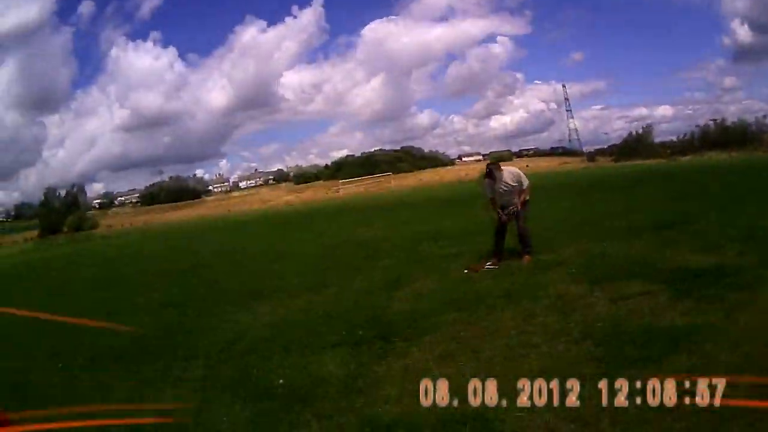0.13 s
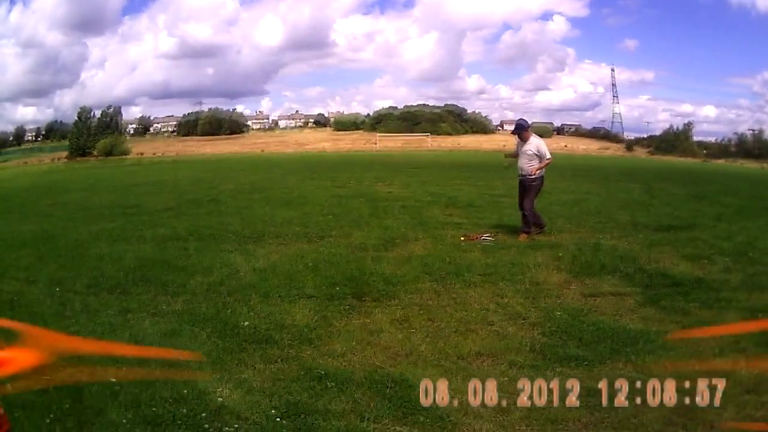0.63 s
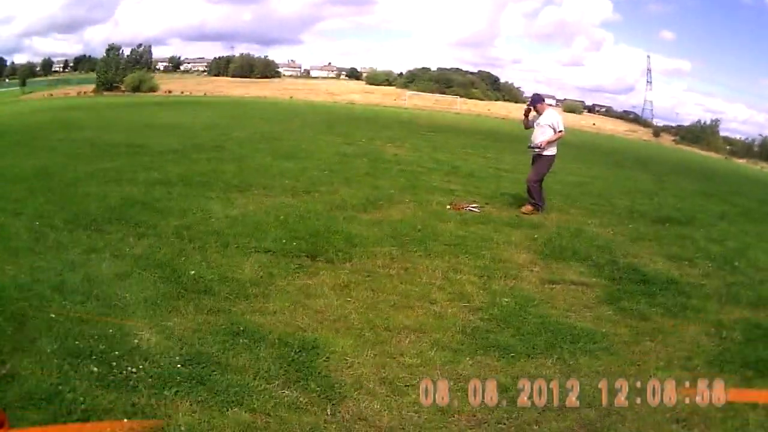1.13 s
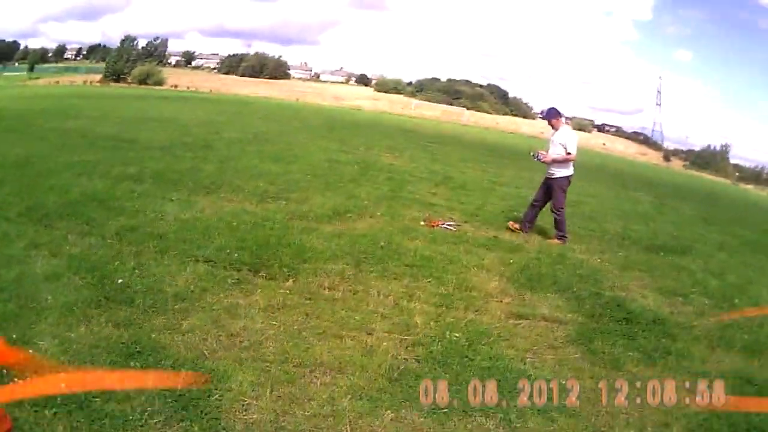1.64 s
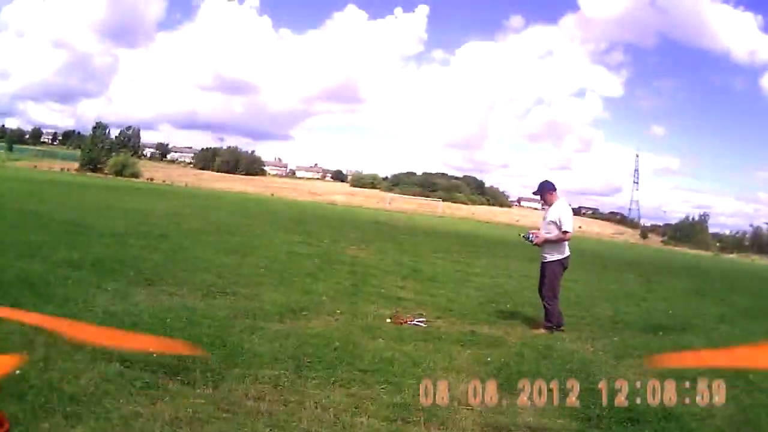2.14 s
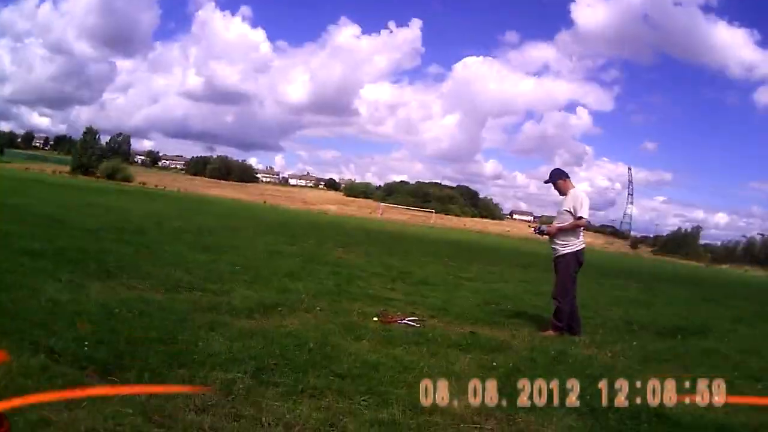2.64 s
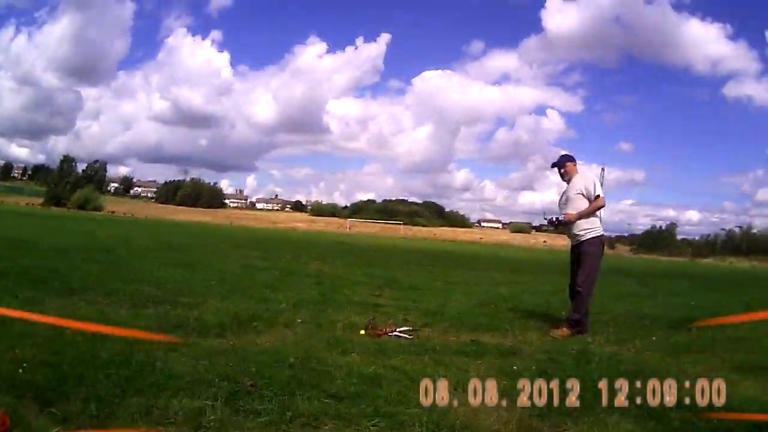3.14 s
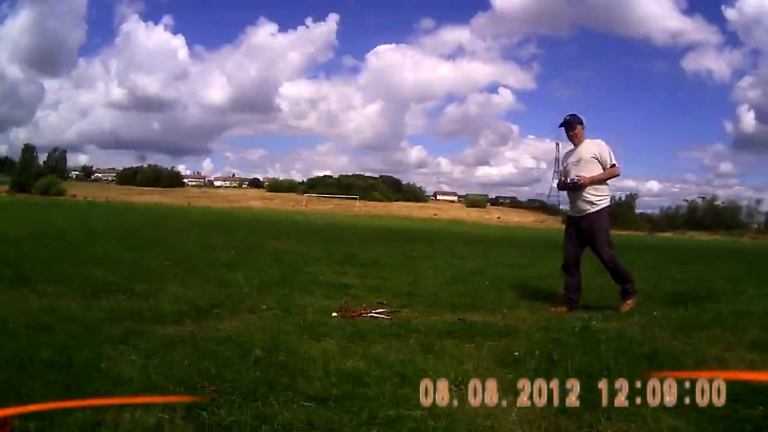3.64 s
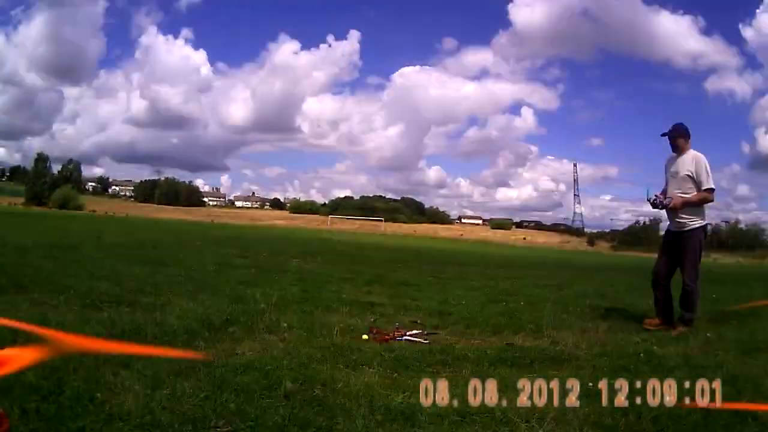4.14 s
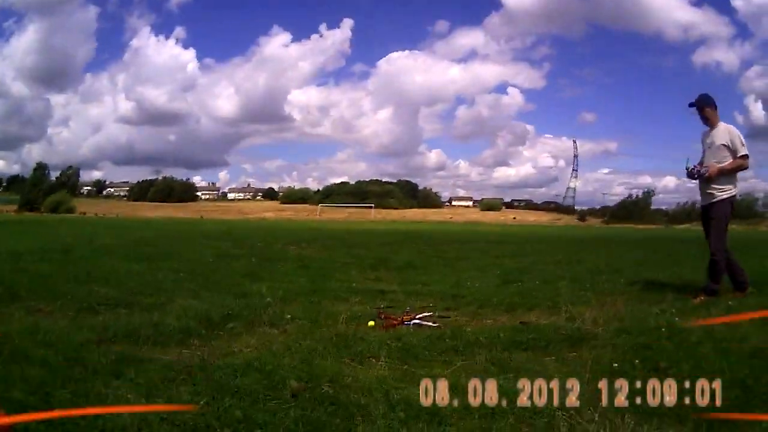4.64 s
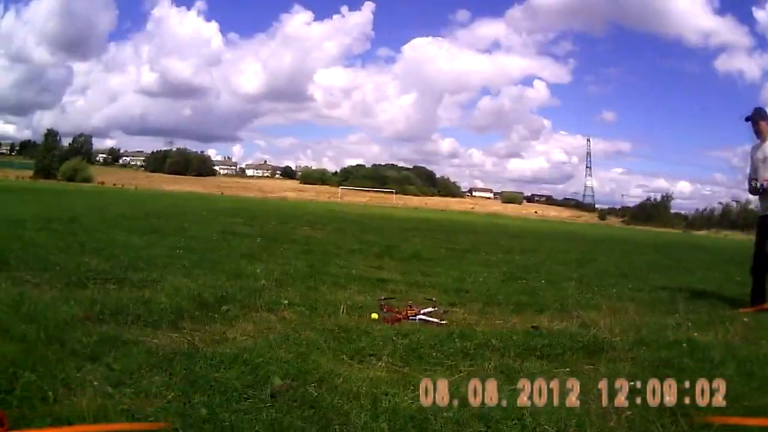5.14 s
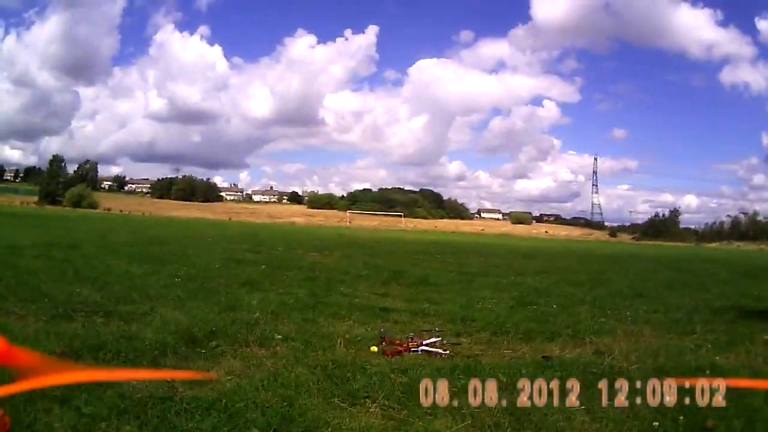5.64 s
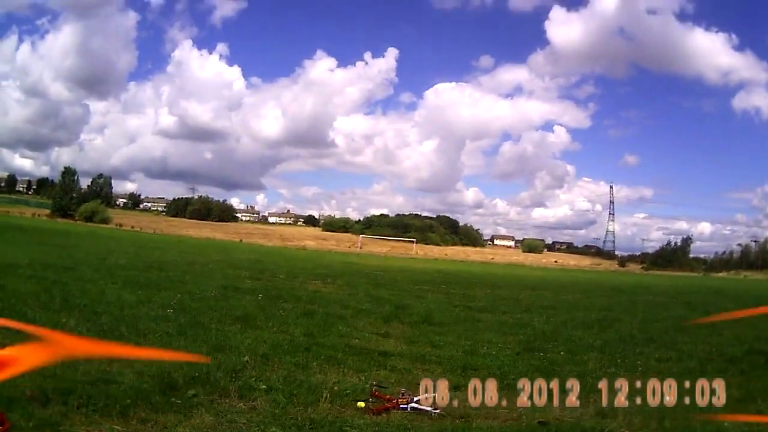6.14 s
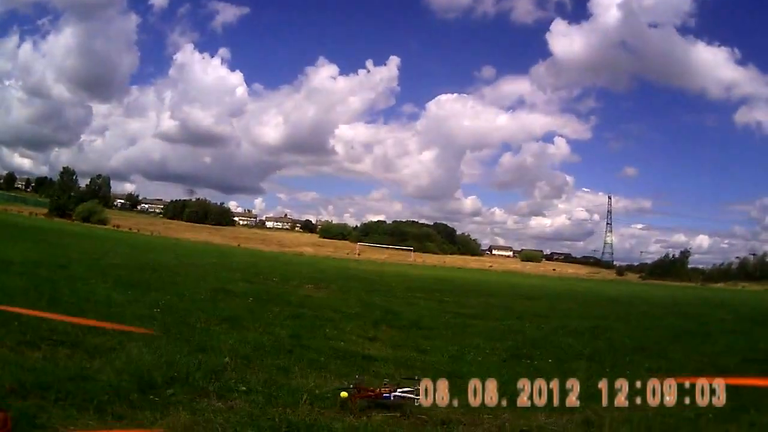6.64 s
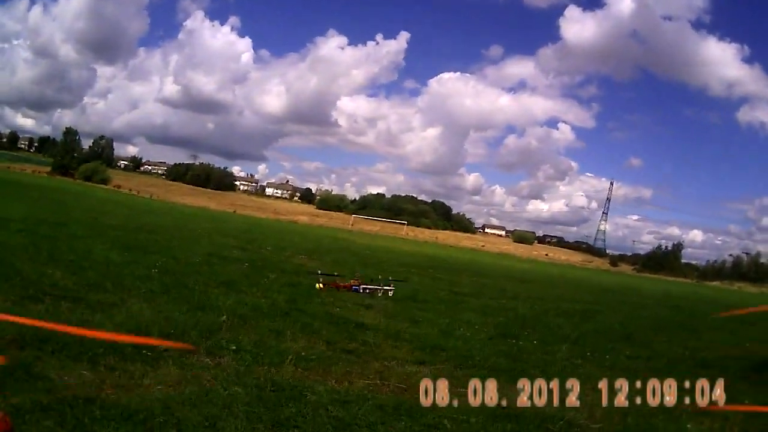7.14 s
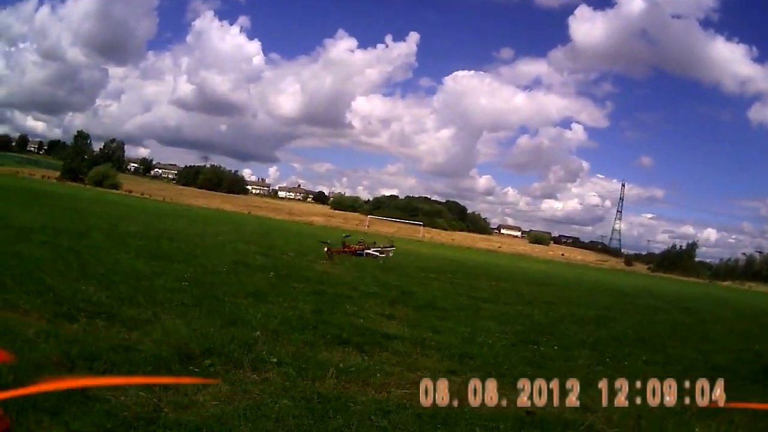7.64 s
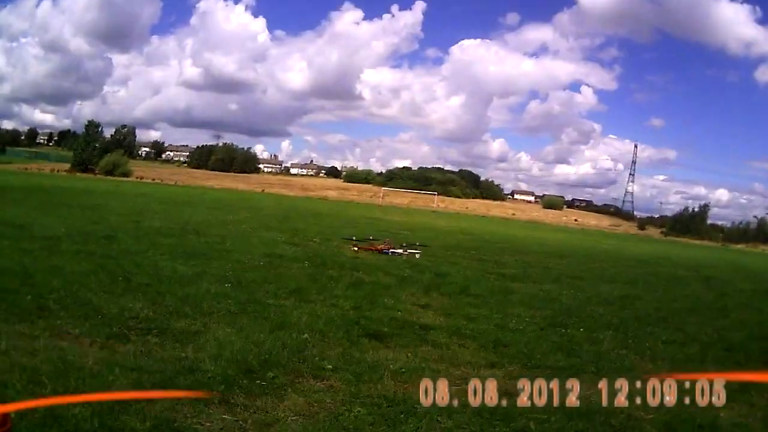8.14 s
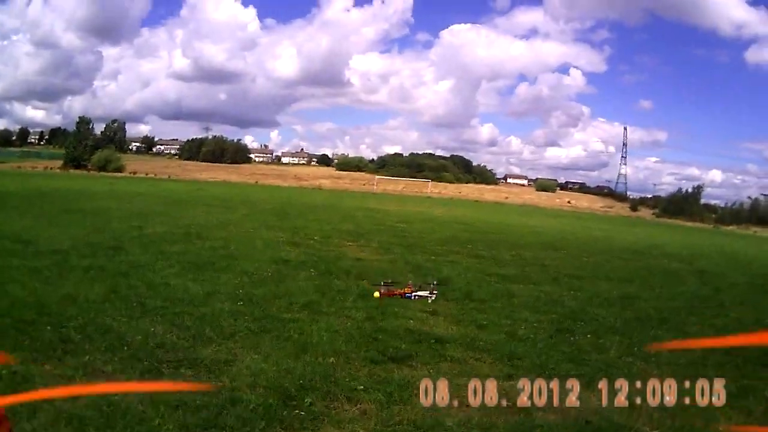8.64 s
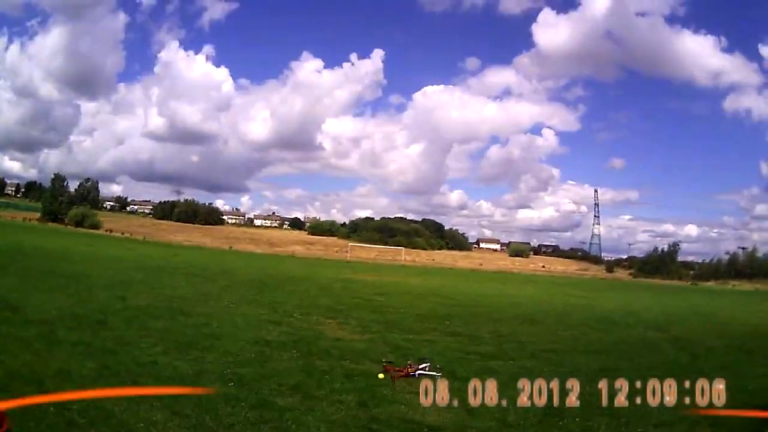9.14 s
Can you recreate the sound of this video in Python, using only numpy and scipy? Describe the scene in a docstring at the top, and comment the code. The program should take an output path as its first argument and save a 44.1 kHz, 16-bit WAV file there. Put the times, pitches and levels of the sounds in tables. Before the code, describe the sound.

Several small propellers drone and throb right against the microphone, with a plastic case buzzing and rattling harshly in short bursts, overloaded and dull.

```python
"""A small camera rides on a hovering four-rotor craft, between the propellers.
From the start the blades throb at slightly different speeds, their downwash buffets the microphone,
and the shaking makes the loose camera case knock on its mount. From about 0.4 s short fits of hard
rattling break in, again and again to the end. Around 2.1 s the far rotor slows under load and grows
louder. Throughout, the loudest moments overload the slow converter at the input."""
import sys
import numpy as np
from scipy import signal
from scipy.fft import rfft, irfft
from scipy.io import wavfile
from scipy.ndimage import map_coordinates

SR = 44100
rng = np.random.default_rng(int(sys.argv[2]) if len(sys.argv) > 2 else 0)


def decibels_to_gain(level_db):
    """Convert a level in decibels to a linear amplitude gain (20 dB per decade)."""
    exponent = np.asarray(level_db, float) / 20
    return 10 ** exponent


def int16_out(signal):
    """Quantize to a 16-bit WAV file."""
    q = np.round(np.clip(np.atleast_2d(signal).T, -1, 1) * 32767)
    wavfile.write(sys.argv[1], SR, q.astype(np.int16))


N = 408366   # length [samples]


def rms_one(x):
    """Scale to unit rms, the usual measure of strength."""
    return x / np.sqrt(np.mean(x ** 2) + 1e-20)


def in_time(rows):
    """Draw straight lines between the rows of a (time, value) table, one value a sample."""
    times, values = np.transpose(rows)
    return np.interp(np.arange(N) / SR, times, values)


def drift(rate_hz):
    """Slow chance wandering around 0 with spread 1: low-passed noise, made at every 40th sample."""
    r = np.exp(-2 * np.pi * rate_hz * 40 / SR)
    noise = rng.standard_normal(N // 40 + 2002)
    slow = signal.lfilter([1], [1, -2 * r, r * r], noise)[2000:]   # skip the filter's start-up
    return np.interp(np.arange(N) / 40, np.arange(len(slow)), rms_one(slow))


def filtered(x, order, hz, kind="low"):
    """Butterworth filter: keeps only part of the pitch range."""
    return signal.sosfilt(signal.butter(order, hz, kind, fs=SR, output="sos"), x)


def filtered_in_place(x, order, hz, kind="low"):
    """The same filter run forwards and backwards, so that nothing is delayed."""
    return signal.sosfiltfilt(signal.butter(order, hz, kind, fs=SR, output="sos"), x)


# tones of a two-blade rotor: (multiple of the blade rate [1], level [dB])
ROTOR_TONES = [(.5, -13), (1, 0), (1.5, -16), (2, -12.5)]


def rotor(hz, level_db, waver_hz, gust_db, overtone_db=0):
    """Blade tone with overtones and shaft tones; each swells on its own in the disturbed air."""
    turns = np.cumsum(hz + waver_hz * drift(6.0)) / SR
    phase = 2 * np.pi * (turns + rng.random())
    tones = 0
    for multiple, db in ROTOR_TONES:
        tone_db = db + overtone_db * (multiple == 2) + gust_db * drift(9.0)
        tones = tones + decibels_to_gain(tone_db) * np.cos(multiple * phase)
    return np.sqrt(2) * decibels_to_gain(level_db) * tones


# speed of the three rotors nearest the microphone, as the craft trims its hover:
# (time [s], blade passes [Hz])
FAST_ROTOR = [(0, 192.6), (.42, 193), (.7, 188.2), (1.12, 194.5), (1.54, 188), (1.82, 195.1), (2.1, 179.2),
              (2.24, 186.5), (2.42, 207), (2.52, 205.2), (2.72, 184), (2.94, 186.9), (3.2, 202.8),
              (3.4, 199.4), (3.8, 198.8), (4.34, 192.2), (4.55, 200.8), (4.76, 199.2), (4.95, 188),
              (5.18, 184.9), (5.58, 202.7), (5.85, 189.3), (6.16, 181.2), (6.55, 196.9), (6.93, 192),
              (7.56, 205.4), (7.84, 201), (8.26, 199.2), (8.82, 193.6), (9.1, 198.6), (9.26, 197.5)]
SLOW_ROTOR = [(0, 177), (.28, 177.7), (.42, 173.4), (.9, 171.4), (1.24, 174), (1.54, 165.8), (1.9, 170.1),
              (2.2, 178), (2.38, 178.6), (2.64, 168.1), (3.0, 177.9), (3.22, 177.1), (3.64, 162),
              (4.06, 172), (4.3, 171), (4.6, 178), (4.9, 164.9), (5.18, 165.1), (5.46, 183.8), (5.62, 175),
              (6.021, 162.1), (6.58, 178.3), (6.86, 164), (6.999, 164.3), (7.26, 175), (7.7, 162.5),
              (7.9, 168.3), (8.3, 173.1), (8.54, 168.8), (8.78, 171), (9.1, 166.6), (9.26, 170.5)]
THIRD_ROTOR = [(0, 184), (.25, 186.5), (.54, 179.5), (.72, 184), (1.08, 188.5), (1.44, 184), (1.8, 185.5),
               (1.98, 180.5), (2.339, 186.5), (2.52, 187), (2.85, 180), (3.06, 188.5), (3.6, 168.5),
               (3.78, 175.5), (3.96, 175.5), (4.14, 165.5), (4.32, 166), (4.68, 178), (4.86, 173),
               (5.22, 184.5), (5.58, 187.5), (5.8, 164), (6.052, 158), (6.548, 167), (6.9, 161), (7.1, 163),
               (7.38, 182.5), (7.74, 184), (8.1, 165.5), (8.3, 167), (8.821, 162.5), (9.0, 171.5),
               (9.26, 174)]
# blade hum of the near rotors, before their own swells: (time [s], level [dB])
HUM = [(0, -17), (.3, -13), (1.2, -16.5), (1.55, -12.5), (2.1, -16), (2.35, -12), (2.7, -14.5), (3.35, -11),
       (3.9, -14.5), (4.6, -12.5), (5.1, -14), (5.45, -11), (6.05, -16.5), (6.6, -13), (7.1, -15.5),
       (7.4, -13.5), (7.8, -15.5), (8.3, -12.5), (8.6, -15.5), (9.26, -14)]
# share of the (fast [dB], slow [dB], third [dB]) rotor in the hum
ROTOR_SHARES = (-4.5, -4.5, -6.5)
SWELL_DB, SWELL_HZ = 3, 5.0   # each near rotor also swells and fades on its own
FAR_SHARE, FAR_DB = .92, -26   # far rotor: speed as share of the fast and slow rotors' mean; level
# once the far rotor slows under load: middle of the bell-shaped sag, its spread, drop, rise
SAG_AT_S, SAG_SPREAD_S, SAG_HZ, SAG_DB = 2.12, .16, 15, 7
SAG_OVERTONE_DB = 13   # the loaded blades sound their overtone more strongly
SUM_TONES_DB = 3.5   # gain on the sum tones


def rotors():
    """Four rotors beating against each other; the one-sided mount adds their sum tones."""
    hum_db = in_time(HUM)
    fast, slow, third = (in_time(rows) for rows in (FAST_ROTOR, SLOW_ROTOR, THIRD_ROTOR))
    blades = 0
    for hz, share_db in zip((fast, slow, third), ROTOR_SHARES):
        level_db = hum_db + share_db + SWELL_DB * drift(SWELL_HZ)
        blades = blades + rotor(hz, level_db, waver_hz=1.4, gust_db=1.0)

    sag = np.exp(-.5 * ((np.arange(N) / SR - SAG_AT_S) / SAG_SPREAD_S) ** 2)
    wander_hz = 4.0 * (1 - sag) * drift(.8)
    far_hz = FAR_SHARE * (fast + slow) / 2 + wander_hz - SAG_HZ * sag
    blades = blades + rotor(far_hz, FAR_DB + SAG_DB * sag, waver_hz=1.5, gust_db=3.5,
                            overtone_db=SAG_OVERTONE_DB * sag)

    sum_tones = filtered(blades ** 2, 2, [250, 420], "band")   # squaring makes the sums
    return blades + decibels_to_gain(SUM_TONES_DB) * sum_tones


# short fits of hard rattling: (start time [s], length [s], rise aimed at [dB])
FITS = [(.439, .025, 6.5), (1.608, 0.02, 2.5), (1.644, 0.022, 3), (1.899, 0.018, 2.5), (2.286, .04, 8),
        (2.335, 0.045, 7), (2.647, 0.027, 8.5), (2.87, 0.022, 5.5), (3.044, 0.06, 3.5), (3.122, 0.049, 6.5),
        (3.237, 0.052, 5.5), (3.312, 0.11, 6.5), (3.499, .02, 7), (3.721, .065, 7), (4.285, .035, 5.7),
        (4.545, 0.027, 5.2), (5.323, .05, 5), (5.448, 0.041, 6), (5.504, 0.03, 5), (5.84, 0.025, 6.5),
        (6.603, 0.018, 7), (6.694, .03, 9), (7.18, 0.02, 9.5), (7.322, 0.05, 8.5), (7.554, .03, 8.5),
        (7.866, 0.051, 7.5), (8.145, .04, 7), (8.208, 0.028, 8), (8.267, 0.088, 8), (8.776, 0.022, 7),
        (9.008, 0.066, 7), (9.165, 0.067, 6)]
FIT_EDGE_S = 0.021   # a fit swells and dies over this time; the shortest turn back before the top


def fits():
    """Rise of the rattling in dB: each fit swells, holds if long enough, and dies."""
    s, rise_db = np.arange(N) / SR, np.zeros(N)
    for start, length, db in FITS:
        first, last = max(int((start - .05) * SR), 0), int((start + length + .05) * SR)
        span = slice(first, last)
        to_nearer_end = np.minimum(s[span] - start, start + length - s[span])
        rise_db[span] += db * np.clip(to_nearer_end / FIT_EDGE_S + .5, 0, 1)
    return rise_db


def ring(clicks, hz, t60):
    """A mode of the case: a unit click sets off a sine of height 1 that fades 60 dB in t60 seconds."""
    r, w = decibels_to_gain(-60 / (t60 * SR)), 2 * np.pi * hz / SR
    return signal.lfilter([0, np.sin(w)], [1, -2 * r * np.cos(w), r * r], clicks + 1e-18)


def soften(x, hz):
    """Two one-pole low-passes round a click off, scaled by a factor set by their pitch."""
    r = np.exp(-2 * np.pi * hz / SR)
    return np.e * (1 - r) * signal.lfilter([1], [1, -2 * r, r * r], x)


# knocking of the case on its mount, before the fits: (time [s], level [dB])
RATTLE = [(0, -7.5), (.75, -11), (.92, -13), (1.1, -9.5), (1.48, -12.5), (1.6, -7), (2.05, -9), (2.18, -11),
          (2.4, -9.5), (3.4, -8), (4.1, -11), (4.5, -8.5), (5.05, -11), (5.6, -8.5), (6.0, -11.5),
          (6.6, -9.5), (7.0, -11.5), (7.5, -8.5), (8.4, -10.5), (8.8, -9), (9.26, -11)]
# what the case rings with: (pitch [Hz], relative strength [dB], time to fade by 60 dB [s])
CASE = [(710, -10.5, 0.0065), (1048, 11.5, 0.0043), (1294, 2.5, 0.0086), (1990, 5.5, 0.0099),
        (2157, 7, 0.0076), (2850, 9.5, 0.0037)]
ROCKING = 1.5   # the case's own wobble against the frame's swing
SHIFT_S = -.0002   # shift of each knock from the crest of the swing (negative: earlier)
PLAY, FLIGHT_S = .35, .0040   # swing needed to land [rms units]; shortest time between crests used
SPREAD_DB, COLOUR_DB = 1.6, 1.8   # scatter of force and of mode strengths
REBOUND_DB, REBOUND_SCATTER_DB = -15.0, 5.0   # the second touch against the first
SHARP_FROM_HZ, SHARP_DB = 1600, -11   # where the high modes begin; their offset between fits
UNEVEN_DB, UNEVEN_SHARP_DB = 1.0, 1.5   # quick chance changes of level and of sharpness
# for each dB of a fit: dB more high modes, dB less free rocking, dB more rebound
FIT_SHARPENS, FIT_STEADIES, FIT_REBOUNDS = 0.41, .9, 1.1


def knocks(shake):
    """The case knocks near crests of its swing past its play, rebounds with varying force, and rings."""
    rise_db = fits()
    level_db = in_time(RATTLE) + rise_db + UNEVEN_DB * drift(15.0)
    sharp_db = SHARP_DB + FIT_SHARPENS * rise_db + UNEVEN_SHARP_DB * drift(6.8)

    # the case follows the frame but also rocks freely on its soft mount
    frame = filtered_in_place(shake, 1, [60, 230], "band")
    wobble = filtered(rng.standard_normal(N), 2, [105, 185], "band")
    rocking = ROCKING * decibels_to_gain(-FIT_STEADIES * rise_db) * rms_one(wobble)
    swing = rms_one(rms_one(frame) + rocking)

    crests = signal.find_peaks(swing, height=PLAY, distance=FLIGHT_S * SR)[0]
    luck = rng.standard_normal((len(crests), 3 + len(CASE)))
    landing = decibels_to_gain(SPREAD_DB * luck[:, 0] + 2.3 * swing[crests])
    rebound_db = REBOUND_DB + FIT_REBOUNDS * rise_db[crests] + REBOUND_SCATTER_DB * luck[:, 2]
    force = np.r_[landing, landing * decibels_to_gain(rebound_db)]
    again = crests + ((.0029 + .0008 * luck[:, 1]) * SR).astype(int)   # rebounds, about 3 ms on
    at = np.clip(np.r_[crests, again] + int(SHIFT_S * SR), 0, N - 1)
    colour = np.r_[luck[:, 3:], -luck[:, 3:]]   # a rebound favours the opposite modes

    blows = np.zeros(N)
    blows[at] = force
    thud = soften(blows, 1200)   # the push itself, a short rounded pulse
    thud = 0.54 * filtered(thud, 1, 170, "high")
    rings = 0
    for k, (hz, db, t60) in enumerate(CASE):
        mode_db = db + COLOUR_DB * colour[:, k] + sharp_db[at] * (hz > SHARP_FROM_HZ)
        blows[at] = force * decibels_to_gain(mode_db)
        rings = rings + ring(blows, hz, t60)
    rings = filtered(rings, 2, 2400)   # plastic on plastic: a blunt contact
    return decibels_to_gain(level_db) * rms_one(thud + rings)


# downwash over the microphone port: (pitch [Hz], relative strength per Hz [dB])
WASH = [(20, -13.5), (50, -8), (90, -2.5), (130, 0.5), (230, -2.5), (285, 0), (350, 1), (480, -3),
        (800, -14), (1400, -21), (2500, -28.5), (3900, -29.5)]
WASH_DB, LUMPS_DB = -14, 1.5   # middle level; spread of its quick changes


def wash():
    """Downwash: lumpy turbulent noise, mostly low, made by colouring even noise."""
    hz = np.maximum(np.arange(N // 2 + 1) * SR / N, 1)
    table_hz, table_db = np.transpose(WASH)
    colour = decibels_to_gain(np.interp(np.log(hz), np.log(table_hz), table_db))
    noise = irfft(rfft(rng.standard_normal(N)) * colour, N)
    return decibels_to_gain(WASH_DB + LUMPS_DB * drift(25.0)) * rms_one(noise)


FIT_SHAKES = .35   # dB more blade sound for each dB of a fit


def scene():
    """Everything reaches the microphone through the frame or from a hand's width away: no room."""
    shake = decibels_to_gain(FIT_SHAKES * fits()) * rotors() + wash()
    return (shake + knocks(shake))[None]


RATE_HZ = 8000   # samples a second of the slow converter
MIRROR_LEAK_DB = -32.5   # gain on the second mirror image that slips past the output filter


def roll_off(x):
    """The treble ends steeply here."""
    return signal.sosfilt(signal.butter(12, 15700, fs=SR, output="sos"), x)


def record(dry):
    """A slow converter overloads; the curve drawn through its samples leaves a faint mirror image of
    the spectrum and overshoots at steep edges; whatever passes full scale is cut off."""
    s, slow_s = np.arange(N) / SR, np.arange(0, N / SR, 1 / RATE_HZ)
    band = filtered(dry[0] - np.mean(dry), 6, 3550)
    held = np.clip(np.interp(slow_s, s, band) + .03, -.92, .92)   # off-centre, then overloaded

    curved = map_coordinates(held, [s * RATE_HZ], order=3, mode="nearest")
    straight = np.interp(s, slow_s, held)
    joined = curved + 0.25 * (straight - curved)
    joined = filtered_in_place(joined, 2, 6200)
    joined = filtered_in_place(joined, 6, 7200)

    hiss = signal.lfilter([.4], [1, -.6], rng.standard_normal(N))   # of the electronics
    joined = joined + decibels_to_gain(-75.5) * hiss
    leak = filtered(straight, 4, [7100, 9900], "band")
    full = np.clip(joined + decibels_to_gain(MIRROR_LEAK_DB) * leak, -1, 1)
    return roll_off(full[None])


dry = scene()
out = record(dry)
int16_out(out)
```